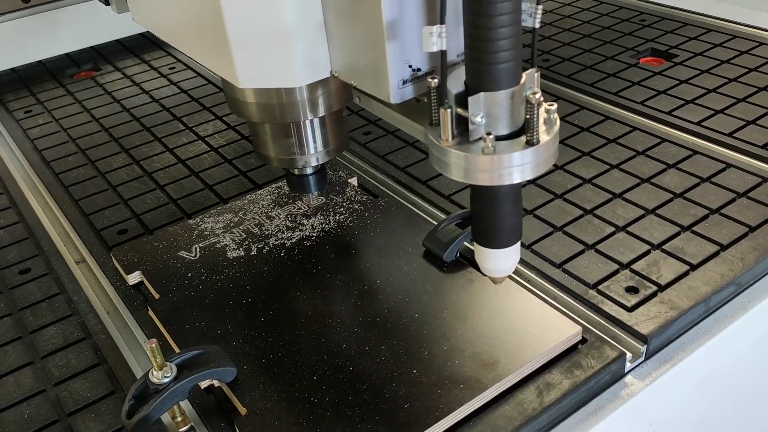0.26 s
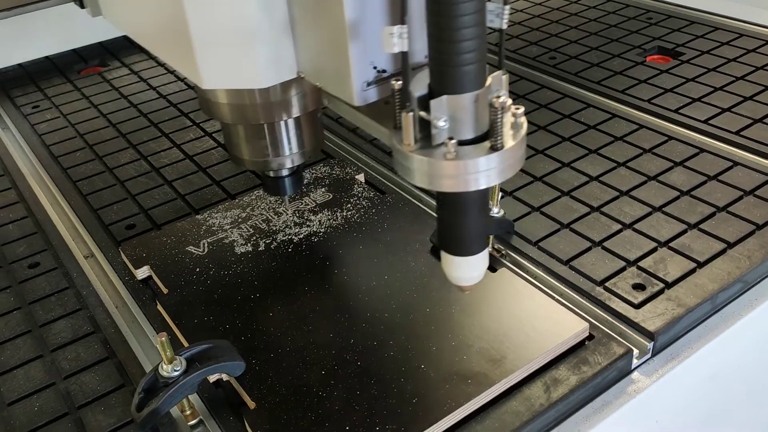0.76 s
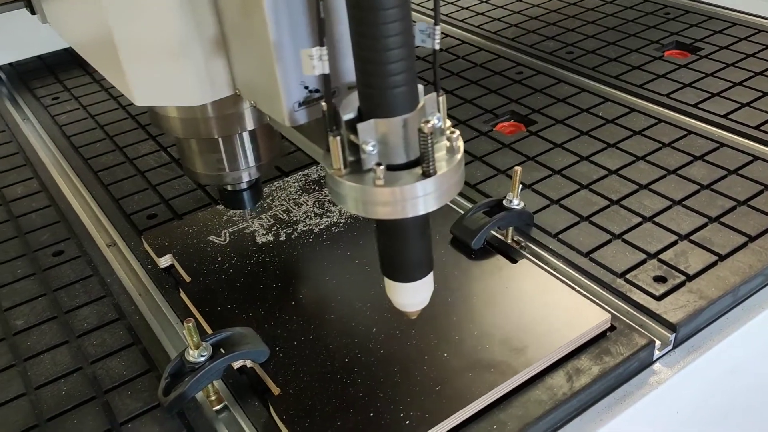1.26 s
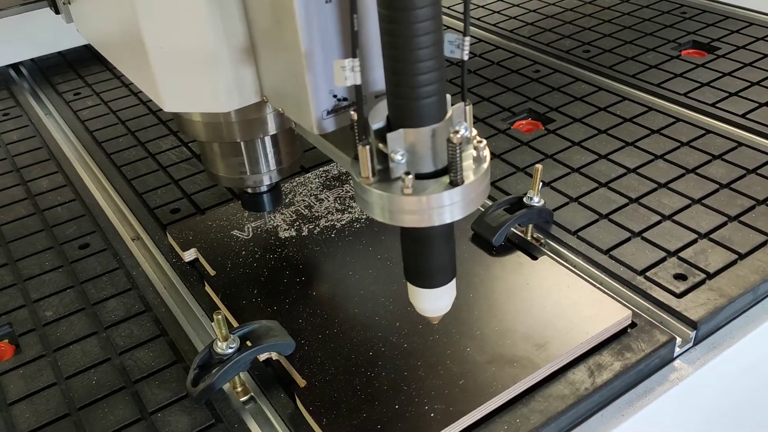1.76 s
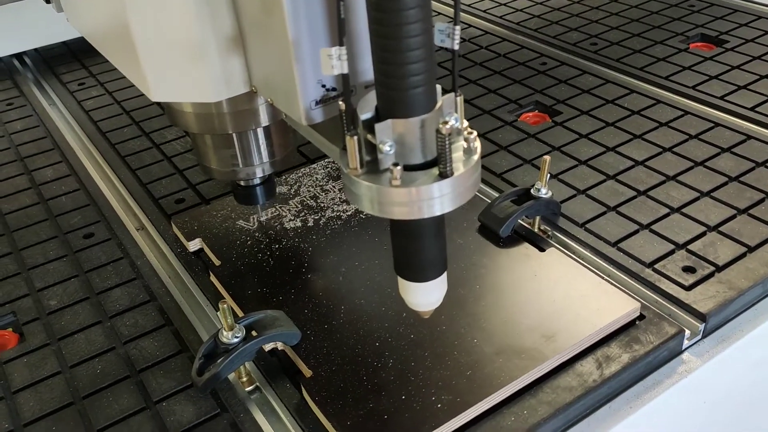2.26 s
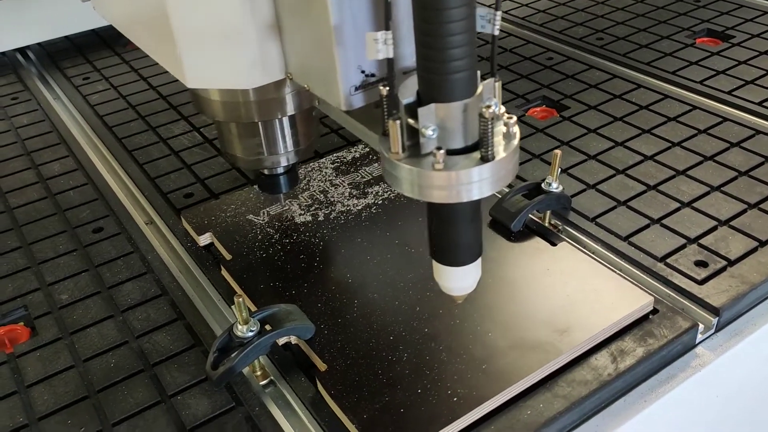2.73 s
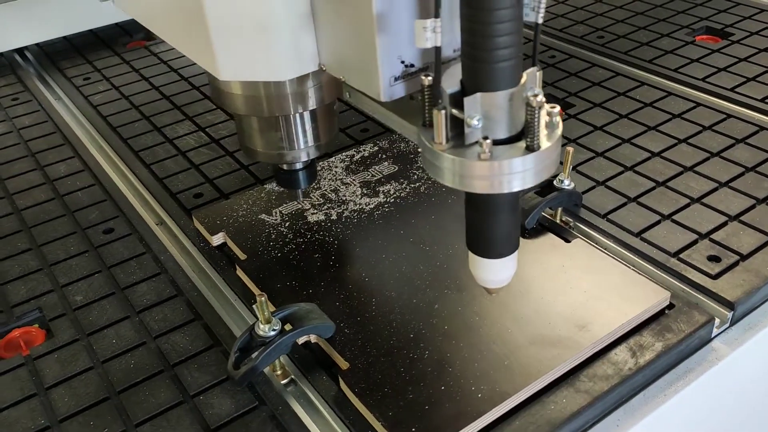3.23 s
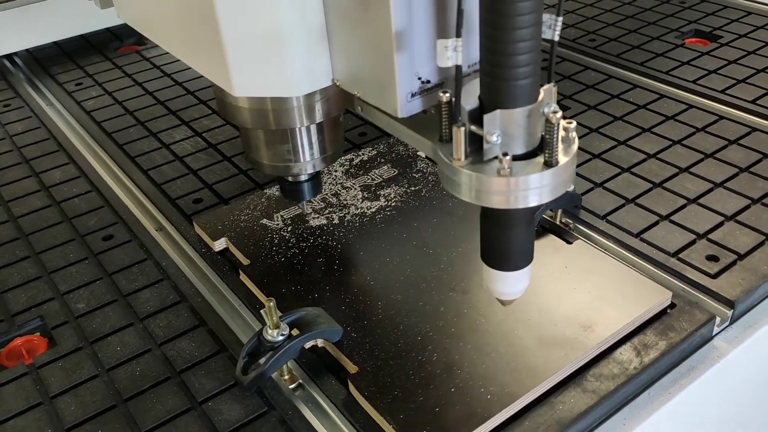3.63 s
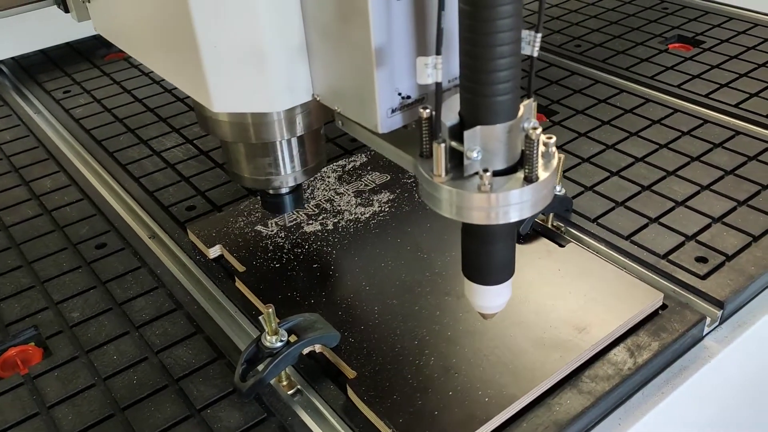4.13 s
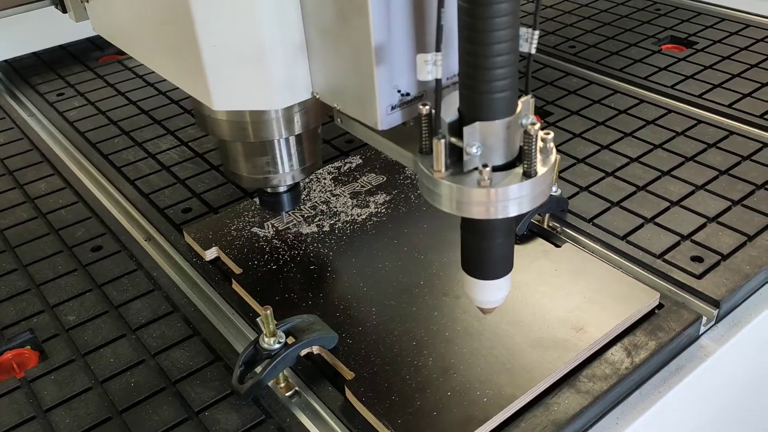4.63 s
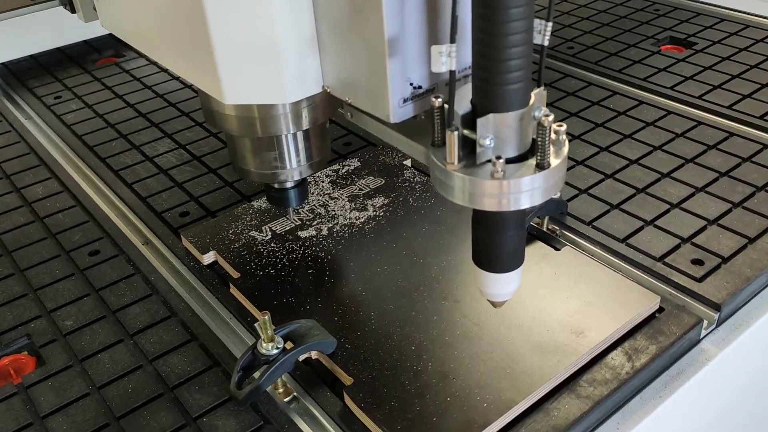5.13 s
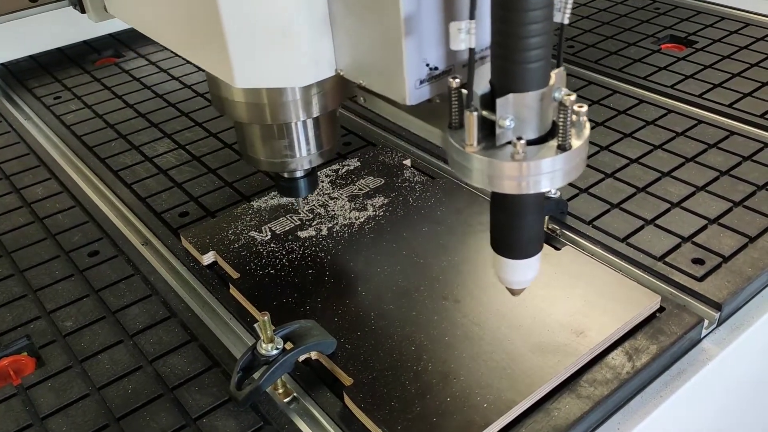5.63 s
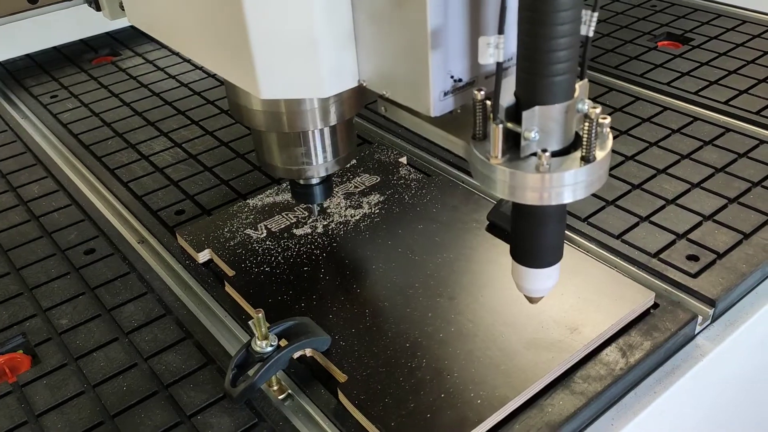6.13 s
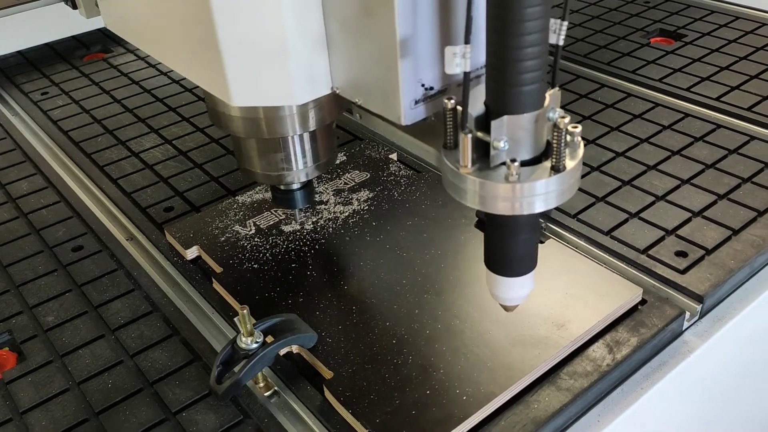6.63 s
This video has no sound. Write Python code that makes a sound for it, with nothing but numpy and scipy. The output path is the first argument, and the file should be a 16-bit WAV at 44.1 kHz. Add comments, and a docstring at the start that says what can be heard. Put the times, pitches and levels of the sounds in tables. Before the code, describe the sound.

A router spindle runs at constant speed close to the microphone in a workshop, a strong hum with a thin high whine above it. A brighter, scraping buzz comes and goes four times as the cutter engraves a metal plate, changing colour from stroke to stroke. Between cuts the spindle keeps running over a rush of cooling air and a faint rumble from the moving gantry.

```python
"""Router spindle cutting a metal plate

A spindle runs at constant speed over a clamped plate in a workshop, close to the microphone.
Its unbalanced shaft hums and its drive sings in sidebands around the switching tone. In the metal
the cutter strikes once a turn, so a buzzing stack of overtones and a scrape come and go
over cooling air and gantry rumble."""
import sys
import numpy as np
from scipy import signal
from scipy.io import wavfile
from scipy.ndimage import uniform_filter1d

SR = 44100
rng = np.random.default_rng(int(sys.argv[2]) if len(sys.argv) > 2 else 0)


def pcm_store(signal):
    """Save signal as 16-bit PCM."""
    levels = np.round(np.clip(np.atleast_2d(signal), -1, 1) * 32767)
    wavfile.write(sys.argv[1], SR, levels.astype(np.int16).T)


N = 303408

SHAFT_HZ, SWITCHING_HZ = 294.17, 6000.5
LIFT_S, STROKE_BLEND_S = 1.53, .016  # from plunge to lift; smoothing between strokes
# The cutter enters the metal, the first cut already under way: start_s
PLUNGES = [-1.185, 1.445, 3.546, 6.368]
# The figure every cut traces: after_plunge_s, hum_lift_db, level_db of harmonics 2 to 6
STROKES = [(0.0, 2.5, -56, -39, -33, -42, -39), (.075, 2.5, -38, -35, -32.5, -33, -40.5),
           (.225, 3, -45, -32, -32, -40.5, -49), (.36, 3, -46, -32, -31, -39, -49),
           (.6, 2.9, -54, -31.5, -31, -36.5, -40.5), (.8, 2.1, -46, -35.5, -31, -33, -35),
           (.94, 2.5, -50, -34, -34, -39, -42.5), (1.14, 2.2, -60, -36, -33, -44, -43),
           (1.47, .5, -43, -33.5, -36.5, -32.5, -37)]
# Each cut's colour, set by its place on the plate:
# extra_db of harmonics 2 to 6, stroke_depth_ratio of harmonic 5, extra_pan_db of harmonics 5 and 6
CUTS = [(-5, 0.89, -2, 3, -1, .25, -10), (0, -0.41, 1.5, 2, 1.3, 1.05, 4),
        (-3, -0.72, 0.5, -0.5, -0.64, .95, -6), (-12, 1.6, 5.5, 5, -2, .3, -2)]
# Stereo image: pitch_hz, coherence, lead_rad. Throughout, lead is right ahead of left, pan left over right.
STEREO_IMAGE = [(70, .997, 0), (200, .91, 0), (500, .85, .05), (1000, .5, .3), (1600, .35, 1.2),
                (3000, .35, 3), (3500, .3, .8), (4500, .3, 2.5), (5900, .15, 2.4), (6300, .88, 0),
                (9000, .55, 0), (15000, .4, 0)]


def gain_of(db):
    """Decibels to gain."""
    return 10 ** (np.asarray(db) / 20)


def spectrum_at(points, hz):
    """Every column of a spectrum table at the frequencies hz."""
    pitches, *columns = np.transpose(points)
    return [np.interp(np.log(hz + 1), np.log(pitches + 1), column) for column in columns]


def automation(curve):
    """Every column of a time table, sample by sample."""
    times, *columns = np.transpose(curve)
    return [np.interp(np.arange(N) / SR, times, column) for column in columns]


def bumps(events):
    """A sum of bell curves: centre_s, length_s, height."""
    t = np.arange(N) / SR
    return sum(height * np.exp(-(2 * (t - s) / length) ** 2) for s, length, height in events)


def waver(width_hz):
    """Slow complex noise of unit power, one row a channel."""
    hop, settle = 64, 500
    frames = N // hop + 2
    pole = np.exp(-np.pi * width_hz * hop / SR)
    raw = rng.standard_normal((2, frames + settle)) + 1j * rng.standard_normal((2, frames + settle))
    slow = signal.lfilter([1], [1, -2 * pole, pole ** 2], raw)[:, settle:]
    slow *= np.sqrt((1 - pole ** 2) ** 3 / (1 + pole ** 2) / 2)
    return np.array([np.interp(np.arange(N) / hop, np.arange(frames), row) for row in slow])


def tone(hz, db, pan_db, lead, rough, width_hz, phase, coherence):
    """One stereo partial, roughened by flutter in level and phase."""
    flutter = waver(width_hz)
    flutter[1] = coherence * flutter[0] + np.sqrt(1 - coherence ** 2) * flutter[1]
    sides = np.array([gain_of(pan_db / 2), gain_of(-pan_db / 2) * np.exp(1j * lead)]).reshape(2, -1)
    carrier = np.sqrt(2) * gain_of(db) * np.exp(1j * (2 * np.pi * hz * np.arange(N) / SR + phase))
    return (carrier * sides * (1 + rough * flutter)).real


def hiss(spectrum, patchy_db, housing_level=0, housing_pan=0):
    """Stereo noise in drifting patches, with an optional share of the housing's ring."""
    hz, _, bins = signal.stft(rng.standard_normal((2, N)), SR, nperseg=2048, noverlap=1536)
    coherence, lead = (column[:, None] for column in spectrum_at(STEREO_IMAGE, hz))
    bins[1] = coherence * np.exp(1j * lead) * bins[0] + np.sqrt(1 - coherence ** 2) * bins[1]
    patches = uniform_filter1d(uniform_filter1d(rng.standard_normal(bins.shape[1:]), 20, 0), 8, 1)
    flicker_db = patchy_db + 2.7 * np.clip(hz / 4000 - 1.6, 0, 1)  # the treble flickers more
    db, pan_db = spectrum_at(spectrum, hz)
    ring_db, ring_pan_db = housing(hz)
    level_db = (db + housing_level * ring_db)[:, None] + flicker_db[:, None] * patches / patches.std()
    sides_db = np.outer([.5, -.5], pan_db + housing_pan * ring_pan_db)
    bins *= np.sqrt(SR / 2) * gain_of(level_db + sides_db[:, :, None])
    return signal.istft(bins, SR, nperseg=2048, noverlap=1536)[1][:, :N]


def spindle():
    """Harmonics of the shaft; the low overtones line up as one blow a turn, offset from the hum."""
    # Hum and buzz: harmonic, roughness, flutter_width_hz
    low_tones = [(1, .04, 40), (2, .18, 20), (3, .2, 46), (4, .15, 56), (5, .18, 84), (6, .26, 82)]
    # Higher shaft and rotor-slot tones: harmonic (rounded), free_db, cutting_db, pan_db, lead_rad
    high_tones = [(7, -83, -60, 14, 5.5), (8, -73, -51, -12, 3), (9, -63, -55, 11.5, 3),
                  (10, -60.5, -57, -14, 3.5), (12, -81, -50, -9.5, 4.5), (13, -60, -79, 6, -7),
                  (14.04, -65, -54.5, -6, -2), (17, -62, -65, 2, 0.5), (19, -61, -56, 2, 1),
                  (20, -59, -66, -7, -9), (22, -41, -43, 2.5, 0), (25, -71, -52, 0, 0.5)]
    depth, out = engagement(), np.zeros((2, N))
    for (k, rough, width_hz), db, (pan_db, lead) in zip(low_tones, hum_db() + strikes_db(), low_pans()):
        mono_gain = abs(gain_of(pan_db / 2) + gain_of(-pan_db / 2) * np.exp(1j * lead)) / 2
        phase = {1: 0, 2: 2.84}.get(k, 2.25 - 1.19 * k)
        partial = tone(k * SHAFT_HZ, db, pan_db, lead, rough, width_hz, phase, coherence=1.0)
        out += partial / np.maximum(mono_gain, .55)
    for k, free_db, cutting_db, pan_db, lead in high_tones:
        hz, phase = round(k) * SHAFT_HZ, rng.uniform(0, 2 * np.pi)
        db = free_db + depth * (cutting_db - free_db) + swell_db(hz)
        out += tone(hz, db, pan_db, lead, rough=.4, width_hz=25, phase=phase, coherence=.85)
    return out


def hum_db():
    """Levels of harmonics 1 and 2: the load lifts the first, the strikes push against the second."""
    # Free-running hum, shifting as head and microphone move: time_s, first_db, second_db
    free_hum = [(0.0, -17, -41.5), (.45, -15.5, -48), (.78, -16.6, -42.5), (1.1, -16, -52.5),
                (1.4, -15.5, -59), (2.2, -15.5, -45), (2.47, -15, -36), (2.7, -15.5, -38), (3.05, -15, -38),
                (3.5, -14.5, -39), (3.65, -15.5, -32), (3.73, -14.5, -43), (3.9, -15.5, -35),
                (4.5, -15.5, -39.5), (4.9, -15.5, -34), (5.35, -14.5, -48), (5.9, -15, -49.5),
                (6.3, -15, -42), (6.6, -15, -44), (6.88, -15.5, -43)]
    first_db, second_db = automation(free_hum)
    strokes = np.array(STROKES)
    lift_db, push = toolpath([np.c_[strokes[:, 1], gain_of(strokes[:, 2] + cut[0])] for cut in CUTS])
    second = abs(gain_of(second_db) - push) + gain_of(-57)
    return [first_db + lift_db + corners_db()[0], 20 * np.log10(second)]


def strikes_db():
    """Levels of harmonics 3 to 6: struck in the metal, ringing on in the room, faint in the air."""
    # Harmonics 3 to 6 stirred by a fast move: level_db
    stirred_db = [-43.5, -46, -49, -49]
    faint_db, tail_db, tail_t60_s = [-60, -64, -63, -66], [-7, -10.5, -15, -7.5], .81
    blows = toolpath([gain_of(stroke_db(cut)) for cut in CUTS]) * gain_of(corners_db()[1:])
    pole = np.exp(-np.log(1000) / (tail_t60_s * SR))
    tail = signal.lfilter([1 - pole], [1, -pole], blows, zi=pole * blows[:, :1])[0]
    idle = gain_of(faint_db)[:, None] + gain_of(stirred_db)[:, None] * fast_moves()
    return list(20 * np.log10(np.maximum(blows, gain_of(tail_db)[:, None] * tail) + idle))


def stroke_db(cut):
    """Levels of harmonics 3 to 6 in each stroke of one cut."""
    _, *place_db, fifth_depth, _ = cut
    levels_db = np.array(STROKES)[:, -4:]
    mean_db = levels_db.mean(0)
    return mean_db + np.array([1, 1, fifth_depth, 1]) * (levels_db - mean_db) + place_db


def toolpath(values_by_cut, blend_s=STROKE_BLEND_S):
    """Each cut's values held stroke by stroke and smoothed, 0 in the air; one curve a column."""
    t, out = np.arange(N) / SR, 0
    starts = np.array([stroke[0] for stroke in STROKES] + [LIFT_S])
    for plunge_s, values in zip(PLUNGES, values_by_cut):
        held = np.pad(values, ((1, 1), (0, 0)))
        out = out + held[np.searchsorted(starts, t - plunge_s)].T
    size = round(blend_s * SR)
    return uniform_filter1d(uniform_filter1d(out, size, axis=1), size, axis=1)


def corners_db():
    """The feed halts at each corner, so hum and strikes slacken for about 35 ms."""
    # Corners of the figure: after_plunge_s, hum_dip_db, dip_db of harmonics 3 to 6
    corners = [(.065, -2, -4, -3, -5, -1), (.21, -1.2, -6, -6, -2, -2), (.8, -1, -8, -4, -1, -6),
               (.94, -1.5, -12, -4, -6, -7)]
    return [bumps([(plunge_s + row[0], .035, row[column]) for plunge_s in PLUNGES for row in corners])
            for column in range(1, 6)]


def engagement(ease_s=.014):
    """The cutter's bite, 0 in the air to 1 in the metal, following the level of harmonic 4."""
    depth = np.clip((strikes_db()[1] + 47) / 14, 0, 1)
    pole = np.exp(-1 / (ease_s * SR))
    return signal.lfilter([1 - pole], [1, -pole], depth, zi=[pole * depth[0]])[0]


def low_pans():
    """Pan and lead of harmonics 1 to 6; the top two also shift with each cut's place on the plate."""
    # The microphone turns slowly: time_s, share_of_turn
    turning = [(0.0, 0.1), (.9, 0.0), (2.0, 0), (2.7, 0.55), (3.9, 0.43), (4.8, 1), (6.88, 0.7)]
    # Placement of each harmonic: pan_before_db, pan_after_db, lead_rad
    placements = [(-1.1, .15, 0.17), (4, -8, 0.93), (2.5, 0, 0.99), (11, 13, -.94), (14, 12, .9),
                  (9, 4, -1.57)]
    turn = automation(turning)[0]
    place_db = toolpath([np.full((len(STROKES), 1), cut[-1]) for cut in CUTS], blend_s=.1)[0]
    return [(before + (after - before) * turn + place_db * (k >= 5), lead)
            for k, (before, after, lead) in enumerate(placements, 1)]


def drive():
    """Whine of the switching tone and its double, beating with the shaft's field."""
    # Drive whine: switching_multiple, added_shaft_multiple, level_db, pan_db
    sidebands = [(1, -9, -59, -3), (1, -7, -57, -4), (1, -4, -75, -16), (1, -3, -56, 4),
                 (1, 1, -43.5, -1.5), (1, 3, -44.5, -1), (1, 4, -62, 7), (1, 5, -69, 5), (1, 19, -60, -1),
                 (1, 23, -62, 1), (1, 25, -68, 0), (2, -22, -51, 6), (2, -15, -79, 6), (2, -6, -63.5, -2),
                 (2, -4, -70, 16), (2, 0, -63.5, -14), (2, 2, -75, 5), (2, 6, -65.5, -11)]
    # Other thin, steady tones: pitch_hz, level_db, pan_db
    whistles = [(2859, -57, -2), (12705, -65, -3), (14470, -68, -3.7)]
    # Two sidebands that roam between the channels: added_shaft_multiple, level_db
    roamers = [(-5, -46), (-1, -42)]
    # Their paths: time_s, lower_pan_db, lower_lead_rad, upper_pan_db, upper_lead_rad
    roam_paths = [(.1, -7, -1.5, -2, 1.6), (.9, -13, 2.5, 16, -0.0094), (1.3, -6, -0.5, 7, 0.0),
                  (1.9, -13, -1, 7, 0.0), (2.9, -14, -1.6, -6, 0.84), (3.5, 0.0, -3.4, 4, 0.0),
                  (3.8, 7, -5, -1, 0.0), (4.7, 9, -6, -3, -0.54), (5.4, 7, -5, -6, 0.61),
                  (6.0, 14, -2.5, -4, .3), (6.6, 1, 1, -5, 0.019)]
    still = [(m * SWITCHING_HZ + k * SHAFT_HZ, db, pan_db) for m, k, db, pan_db in sidebands] + whistles
    partials = [(hz, db, pan_db, spectrum_at(STEREO_IMAGE, hz)[1]) for hz, db, pan_db in still]
    paths = automation(roam_paths)
    partials += [(SWITCHING_HZ + k * SHAFT_HZ, db, pan_db, lead)
                 for (k, db), pan_db, lead in zip(roamers, paths[::2], paths[1::2])]
    out = np.zeros((2, N))
    for hz, db, pan_db, lead in partials:
        rough, width_hz = (.2, 12) if hz < 9000 else (.45, 30)  # the highest tones flutter most
        phase = rng.uniform(0, 2 * np.pi)
        out += tone(hz, db + swell_db(hz), pan_db, lead, rough, width_hz, phase, coherence=.57)
    return out


def swell_db(hz):
    """Single tones fade or swell as head and microphone move through the room's standing waves."""
    # Tones within 2 % of these are affected: pitch_hz
    pitches = [4530, 5706, 6295, 6472, 6883, 12001]
    # Swells and fades, one list a pitch: centre_s, length_s, change_db
    swells = [
        [(0.0, 0.37, -3), (.55, 0.45, 2), (1.1, 0.1, -6), (2.7, 1.1, 2.5), (5.6, 0.87, -1), (6.45, 0.37, -10),
         (6.88, .3, -13)],
        [(.55, .5, -7), (1.15, 0.17, -9), (1.8, .6, 3), (2.35, 0.23, -7), (3.45, .4, 3.5), (4.05, 0.25, -3),
         (4.8, 0.27, -5), (6.1, 1, 5)],
        [(1.05, 0.091, -8), (1.4, 0.55, 3.5), (1.8, .3, -6), (2.5, .25, 2), (3.4, 0.53, -16), (4.55, 0.95, -7),
         (5.65, 0.44, -12), (6.1, .4, 3)],
        [(.45, 0.82, 4), (.85, 0.15, -11), (1.4, 0.44, -13), (3.5, .3, -7), (4.9, 0.23, -2), (5.5, 0.69, 1),
         (6.4, .6, -10)],
        [(1.3, 0.81, -22), (3.75, .5, -18), (5.35, 0.11, -9), (4.15, 0.16, -12), (5.8, 0.41, 5),
         (6.15, 0.32, -6), (6.75, 0.5, -14)],
        [(.2, .3, 4), (1.9, .4, -9), (2.35, 0.33, 6), (2.85, .3, -7), (4.1, 0.48, -25), (4.95, .4, 3),
         (6.75, .5, -23)],
    ]
    distance = abs(np.log(hz / np.array(pitches)))
    return bumps(swells[np.argmin(distance)]) * (distance.min() < .02)


def scrape():
    """Cutting noise, throbbing once a turn, and the same metal stirred by the fast moves."""
    # The edge scraping metal, chips flying: pitch_hz, density_db, pan_db
    spectrum = [(396, -96, 13), (865, -72, -3), (1250, -74, 4.5), (1470, -63.5, 4.5), (1690, -69.5, 12),
                (2240, -70, 2.5), (3000, -74, 1), (3410, -74, -4.5), (4700, -82, -2), (6230, -73.5, 5),
                (7850, -85, -2), (11000, -102, 7)]
    # Brightness of the spot being cut: time_s, lower_band_db, upper_band_db
    brightness = [(.2, 5, 0), (1.8, -8, 1.5), (2.6, -4.5, 2.5), (4., -6, 4), (4.7, -3, 1.5), (6.6, -2, 2.5)]
    throb = 1 + .11 * np.cos(2 * np.pi * SHAFT_HZ * np.arange(N) / SR)
    noise = hiss(spectrum, patchy_db=1.94, housing_level=.77)
    for band_hz, db in zip([(1900, 2800), (3200, 4600)], automation(brightness)):
        band = signal.sosfiltfilt(signal.butter(2, band_hz, "bandpass", fs=SR, output="sos"), noise)
        noise = noise + (gain_of(db) - 1) * band
    return noise * (engagement() * throb + fast_moves())


def fast_moves():
    """Envelope of the brief rushes as the gantry starts and stops a fast move."""
    # Rushes: centre_s, length_s, level_db relative to the scrape
    rushes = [(5.44, 0.17, -5), (6.084, 0.16, -3.5)]
    return bumps([(s, length, gain_of(db)) for s, length, db in rushes])


def cooling_air():
    """Steady rush through the spindle, lifted at the housing's resonances."""
    # Air and bearings: pitch_hz, density_db, pan_db
    spectrum = [(40, -99, -3), (129, -82, -6), (203, -71, 1.5), (324, -61, 9.5), (406, -72, -0.5),
                (915, -76, -0.5), (2310, -75.5, 6), (3450, -82, 0.5), (5970, -74.5, -1.5),
                (7500, -80.5, -5.5), (7650, -87.5, 1), (9800, -90.5, -3.5), (13000, -104, -11),
                (15600, -112, 5)]
    return hiss(spectrum, patchy_db=2.28, housing_level=1, housing_pan=1)


def housing(hz):
    """Boost and pan, in dB, that the ringing spindle housing gives to noise."""
    # Resonances: pitch_hz, width_hz, boost_db, pan_db
    modes = [(167.5, 22, 10, -3), (1104, 65, 11, 4.5), (1450, 56, 5, 5), (1716, 77, 11, -1),
             (2014, 60, 9, 6), (6390, 250, 3.5, 7)]
    return sum(np.outer([boost_db, pan_db], 1 / (1 + (2 * (hz - pitch_hz) / width_hz) ** 2))
               for pitch_hz, width_hz, boost_db, pan_db in modes)


def gantry_rumble():
    """Lumpy low noise of the moving gantry, stronger while the cutter travels in the air."""
    # Rumble: pitch_hz, density_db, pan_db
    spectrum = [(20, -100, 2), (45, -89, -2), (80, -72.5, -2), (120, -78, 9), (200, -75.5, 6),
                (400, -110, 6)]
    return hiss(spectrum, patchy_db=3.4) * gain_of(-6 * uniform_filter1d(engagement(), 8000))


def scene():
    """The whole machine in stereo."""
    return spindle() + drive() + cooling_air() + gantry_rumble() + scrape()


def record(dry):
    """A steep low-pass takes off the very top."""
    cutoff_hz = 15620
    lowpass = signal.firwin(511, cutoff_hz, window=("kaiser", 9), fs=SR)
    return signal.oaconvolve(dry, lowpass[None], "same")


dry = scene()
out = record(dry)
pcm_store(out)
```